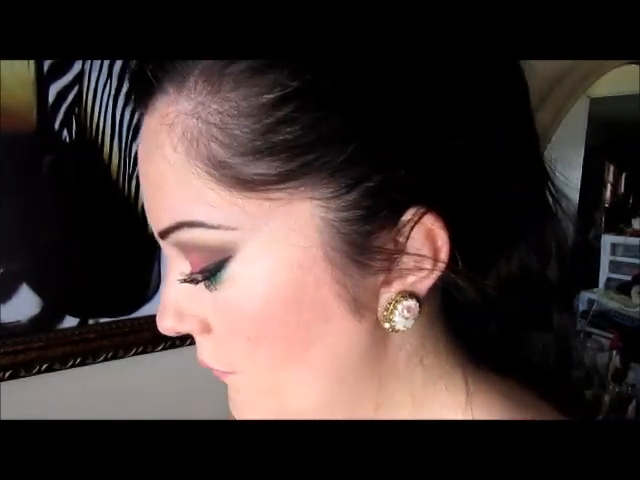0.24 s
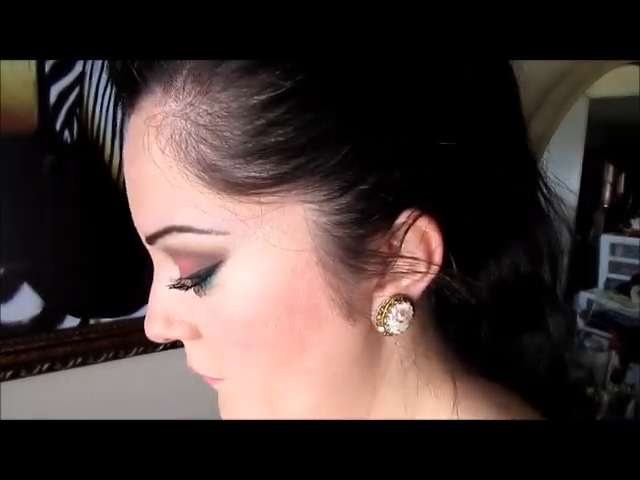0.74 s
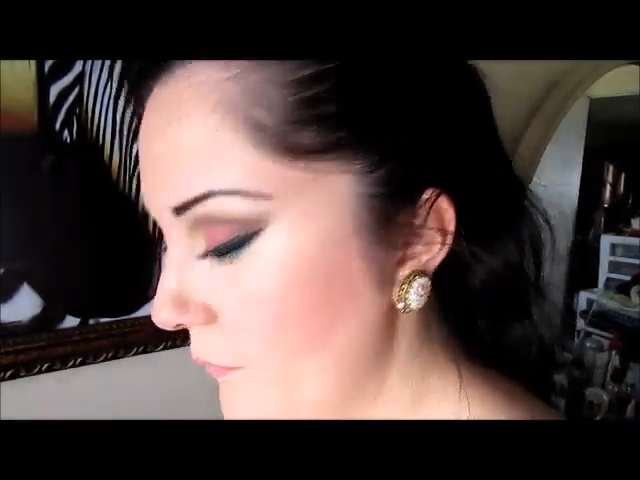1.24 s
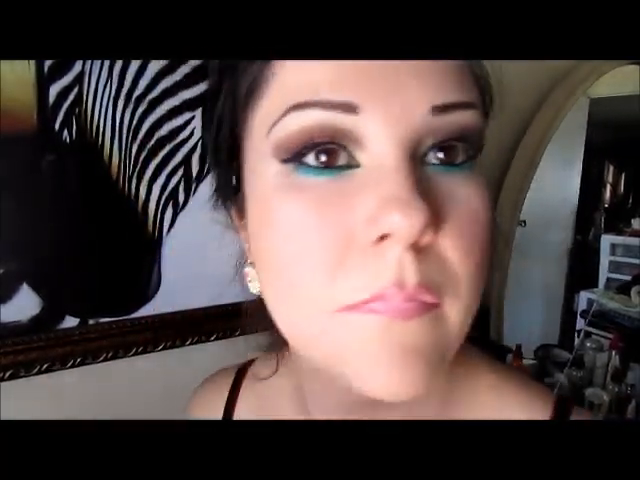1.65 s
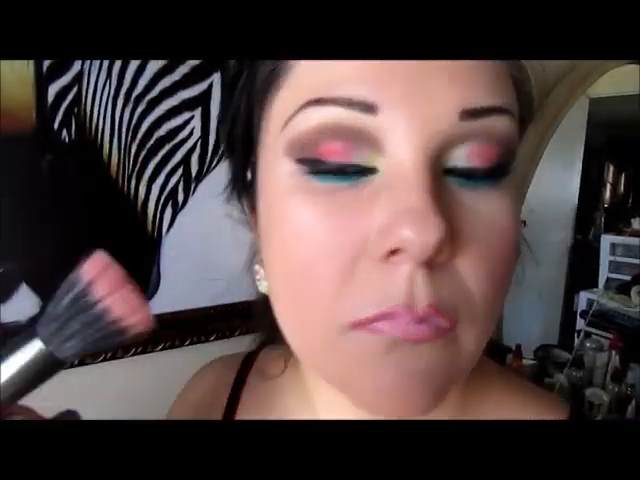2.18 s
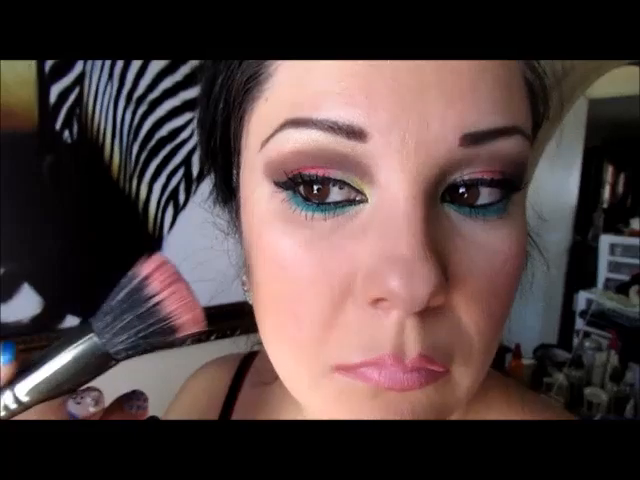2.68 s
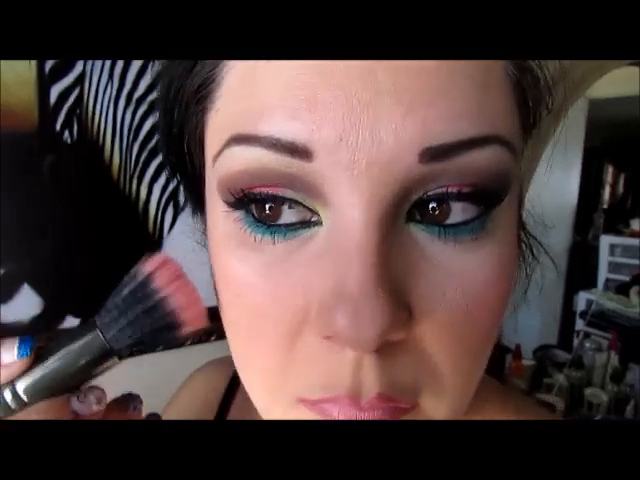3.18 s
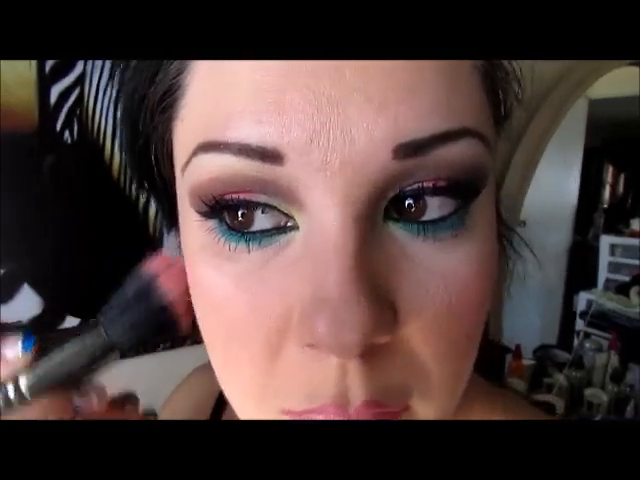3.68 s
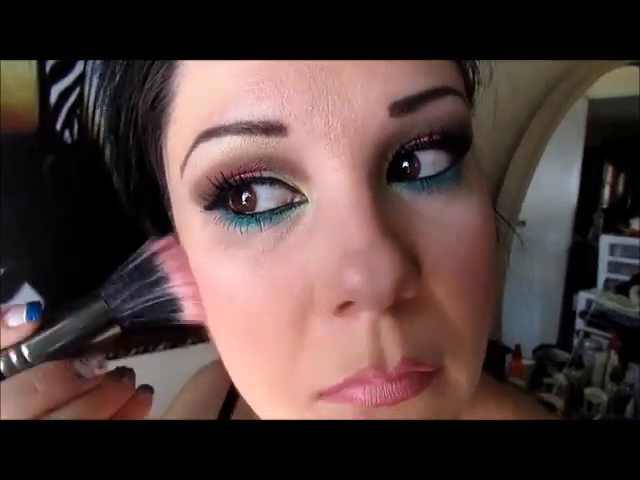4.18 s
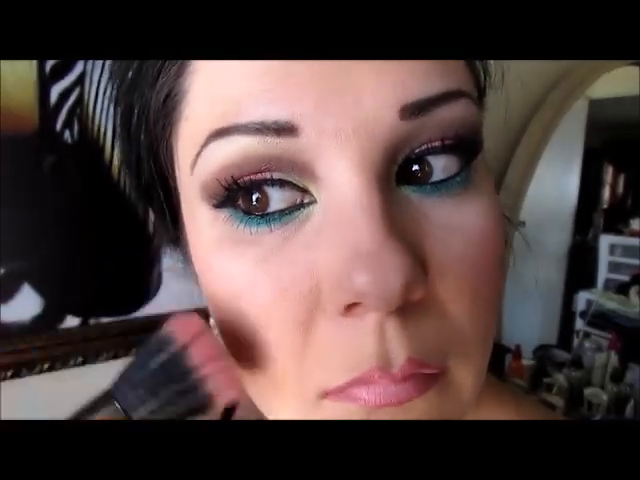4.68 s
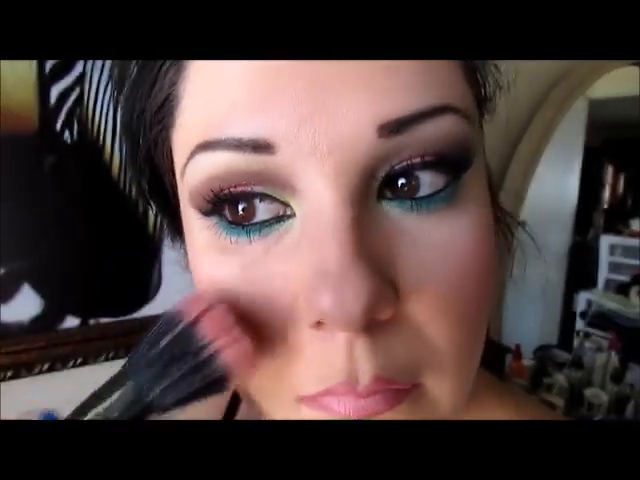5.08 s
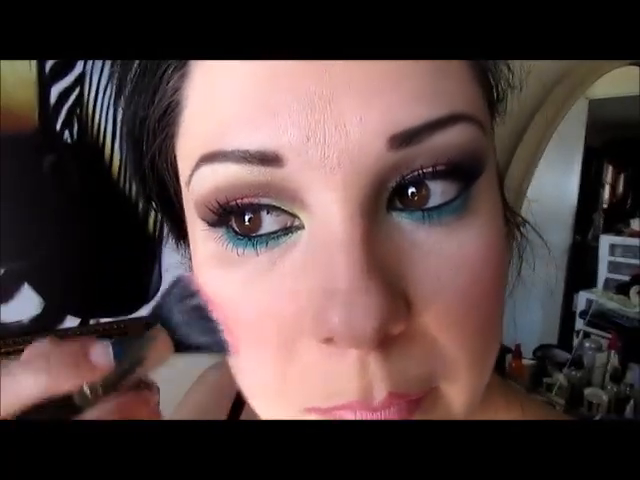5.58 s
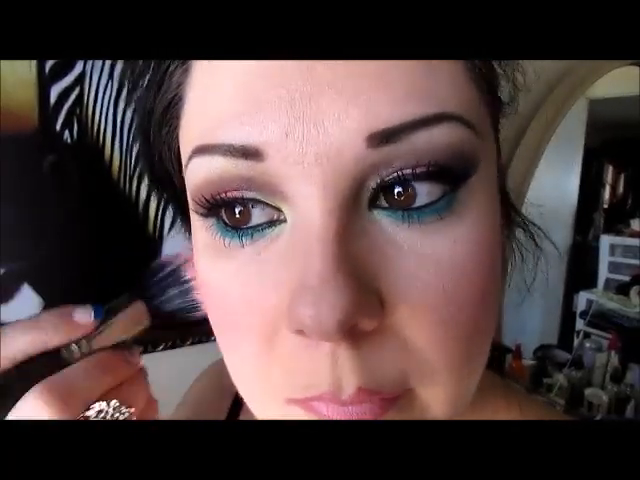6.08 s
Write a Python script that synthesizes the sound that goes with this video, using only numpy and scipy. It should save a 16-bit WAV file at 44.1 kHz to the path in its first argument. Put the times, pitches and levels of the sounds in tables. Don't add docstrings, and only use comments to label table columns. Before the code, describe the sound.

A rapid cluster of hollow plastic clacks and crisp hinge clicks comes first, slightly left. It thins to light taps, then a gap of bassy background hiss. A brush hand bumps the table, five firm knocks growing louder, rattling the camera stand with low wide shakes. Afterwards it is quiet indoors, with faint high focus-motor pips and weak late knocks picked up by the camera's built-in stereo microphone.

```python
import sys
import numpy as np
from scipy import signal
from scipy.fft import rfft, irfft
from scipy.io import wavfile
from scipy.ndimage import uniform_filter1d

SR = 44100
rng = np.random.default_rng(int(sys.argv[2]) if len(sys.argv) > 2 else 0)


def bounce(signal):
    frames = np.transpose(np.atleast_2d(signal))
    limited = np.clip(frames, -1, 1)
    pcm = np.round(limited * 32767).astype(np.int16)
    wavfile.write(sys.argv[1], SR, pcm)


def nominal_scale(level):
    x = np.asarray(level, float) / 20
    return 10 ** x


N = 279549
TIME = np.arange(SR // 3) / SR
SPOT_DB = 2


def peak_one(x):
    return x / np.max(np.abs(x))


def add(out, start_s, sound):
    i = round(start_s * SR)
    out[..., i:i + sound.shape[-1]] += sound[..., :N - i]


def band(x, low_hz, high_hz):
    sos = signal.butter(2, [low_hz, high_hz], "band", fs=SR, output="sos")
    y = signal.sosfilt(sos, x)
    return y / y.std()


def low_cut(x, hz):
    return signal.sosfilt(signal.butter(3, hz, "high", fs=SR, output="sos"), x)


def ringing(hz, level_db, t60_s, lead_rad=0):
    decay = nominal_scale(level_db[:, None] - 60 * TIME / np.maximum(t60_s, .002)[:, None])
    phase = 2 * np.pi * hz[:, None] * TIME + np.reshape(lead_rad, (-1, 1))
    return (decay * np.sin(phase)).sum(axis=0)


def soft_blow(x, contact_s):
    return np.convolve(x, np.hanning(int(contact_s * SR) + 3))[:len(x)]


def rattle(length_s, share, size):
    grains = rng.standard_normal(size) * nominal_scale(1.97 * rng.exponential(1, size))
    grains = grains * (rng.random(size) < share)
    age = TIME[:size] / max(length_s, .001)
    return peak_one(grains * np.sqrt(age + 0.2) * np.exp(-1.5 * age ** 2))


def crackle(clicks, hz):
    hump = band(clicks, 0.92 * hz, min(1.104 * hz, 16000))
    return peak_one(band(clicks, 1400, 7340) + 0.63 * hump)


def compact(grip_db):
    # hz, level_db, t60_s
    hollow_modes = [(198, -31, 0.044), (265, -10.5, 0.079), (320, -8, 0.077), (435, -33, 0.033),
                    (506.4, 3, 0.025), (549, -5.5, 0.071), (626, -9.5, 0.036), (706, -14.5, 0.048)]
    # hz, level_db, t60_s
    shell_modes = [(831, 5, 0.036), (924, 0.5, 0.031), (1060, 1.5, 0.026), (1110, 1, 0.027),
                   (1295, 9.5, 0.013), (1370, 5, 0.02), (1420, -11, 0.035), (1630, -9, 0.063),
                   (1706, -0.5, 0.044), (1890, -17, 0.022), (2100, -9, 0.017), (2390, -13, 0.012),
                   (2590, -9, 0.018)]
    parts = np.zeros((3, N))
    for start_s, hollow_db, shell_db, crack_db, crack_hz, rattle_s in contacts():
        clicks = rattle(rattle_s, share=0.43, size=1500)
        touch_s = .00003 * max(shell_db - crack_db, 0)
        bodies = (parts[0], hollow_modes, hollow_db), (parts[1], shell_modes, shell_db + 5.0)
        for part, modes, db in bodies:
            hz, mode_db, t60_s = np.transpose(modes)
            held = rng.standard_normal((2, len(hz)))
            rung = ringing(hz * (1 + 0.022 * held[0]), mode_db + grip_db * held[1], t60_s)
            rung = soft_blow(rung, touch_s)
            add(part, start_s, nominal_scale(db) * peak_one(signal.fftconvolve(clicks, rung)))
        add(parts[2], start_s, nominal_scale(crack_db + 4.5) * crackle(clicks, crack_hz))
    return parts


def contacts():
    # start_s, hollow_db (peak), shell_db (re hollow), rattle_s
    thump_table = [(0.4404, -10, -19, .0012), (0.492, -22.5, -9, 0.0033), (0.698, -26.5, -20, 0.0056),
                   (.707, -11.5, -23.5, 0.0047), (.719, -15.5, -29, 0.0015), (.818, -38, -21, 0.0053),
                   (0.941, -25.5, -14, 0.0096), (.948, -22, -8.5, 0.0031), (.954, -31, -23, 0.0053),
                   (1.018, -33.5, -16.5, 0.013), (1.085, -33.5, -2.5, 0.002), (1.118, -31, -2, 0.0051),
                   (1.127, -27.5, -7, 0.0057), (1.246, -46.5, -19, 0.0087)]
    # start_s, hollow_db (peak), crack_db (re hollow), crack_hz, rattle_s
    snap_table = [
        (0.308, -15.5, -24.5, 5600, 0.0016),
        (.311, -18, -22.5, 6160, 0.0028),
        (.444, -13, -23, 6000, 0.0033),
        (.463, -21, -7.5, 7460, 0.0061),
        (0.466, -22.5, -16, 11000, 0.01),
        (0.885, -35.5, -12, 6700, 0.0055),
        (.901, -18, -24.5, 6460, 0.0053),
        (0.905, -22.5, -14, 4750, 0.0044),
    ]
    # start_s, shell_db (peak), crack_db (re shell), crack_hz, rattle_s
    lid_table = [(.32, -25.5, -29, 3000, 0.005), (0.457, -27, -13, 2650, 0.015),
                 (0.515, -28, -9.5, 3000, 0.015), (0.543, -26.5, -4.5, 3260, 0.0042),
                 (0.548, -27, -10, 5920, 0.014), (.583, -42, -8, 6000, 0.0084),
                 (0.751, -40, -7, 3220, 0.00505), (0.804, -36, -1, 3470, 0.0073),
                 (.828, -37, -13, 2200, 0.0036), (0.853, -31, -13, 2700, 0.0069)]
    events = []
    for start_s, db, shell_db, rattle_s in thump_table:
        events.append((start_s, db, db + shell_db, db - 30.5, 2900, rattle_s))
    for start_s, db, crack_db, hz, rattle_s in snap_table:
        events.append((start_s, db, db - 10.5, db + crack_db, hz, rattle_s))
    for start_s, db, crack_db, hz, rattle_s in lid_table:
        hollow_db = db + 4 - 900 * rattle_s
        events.append((start_s, hollow_db, db, db + crack_db, hz, rattle_s))
    return sorted(events)


def rubbing():
    # start_s, hold_s, dull_db, bright_db (re dull), rumble_db (re dull)
    slide_table = [(.328, .005, -45.5, -22, -4.5), (0.442, 0.11, -46, -9.5, -4),
                   (0.549, 0.018, -44.5, -12, -1.5), (0.708, 0.053, -45, -22, -5), (.82, 0.06, -49, -17, 1),
                   (.94, .02, -56.5, -13, 11.5), (1.02, 0.037, -58, -18, 6.5),
                   (1.128, 0.0034, -52.5, -24, 0), (1.26, 0.063, -62.5, -9.5, -8)]
    attack_db_per_s, release_db_per_s = 700, 177
    slips = rng.standard_normal((3, N)) * nominal_scale(2.1 * rng.exponential(1, (3, N)))
    noises = np.array([band(slips[0], 220, 970), band(slips[1], 1300, 8300), band(slips[2], 64, 184)])
    t = np.arange(2 * SR) / SR
    gain = np.zeros((3, 2 * SR))
    for start_s, hold_s, dull_db, bright_db, rumble_db in slide_table:
        rise_db = attack_db_per_s * np.maximum(start_s - t, 0)
        fade_db = release_db_per_s * np.maximum(t - start_s - hold_s, 0)
        slide = nominal_scale(dull_db - rise_db - fade_db) * nominal_scale([[0], [bright_db], [rumble_db]])
        gain = np.maximum(gain, slide)
    return noises * np.pad(gain, ((0, 0), (0, N - 2 * SR)))


def struck(modes, blow, contact_s, rise_s):
    hz, db, t60_s, diff_db, lead_rad = np.transpose(modes)
    db = db + SPOT_DB * rng.standard_normal(len(hz))
    swell = 1 - np.exp(-TIME / max(rise_s, .0001))
    in_sum = soft_blow(swell * ringing(hz, db, t60_s), contact_s)
    in_diff = soft_blow(swell * ringing(hz, db + diff_db, t60_s, lead_rad), contact_s)
    both = signal.fftconvolve([in_sum, in_diff], blow[None])
    return both / np.max(np.abs(both[0]))


def knocks():
    # start_s, stand_db (peak), panel_db (re stand), bracket_db (re stand)
    knock_table = [
        (2.192, -32.5, -2, 4.5),
        (2.496, -29.5, -0.5, -9.5),
        (2.548, -26.5, 0, -12),
        (2.674, -25, -0.5, -9.5),
        (2.748, -20.5, -4, -11.5),
        (4.957, -37.5, -3.5, -14),
        (4.974, -45, 3, -8),
        (5.642, -48.5, 1.5, -9.5),
    ]
    # hz, level_db, t60_s, diff_db (re sum), lead_rad (of difference)
    panel_modes = [(195.6, -16.5, 0.27, 6, .1), (260, -9.5, 0.12, 3, .1), (283.3, -16, 0.28, 12, 1.4),
                   (325.5, 18, 0.045, 2, 1.06), (388, -2, 0.087, 9.5, 0.038), (481, -5, 0.11, -7, .1),
                   (553, -7, 0.077, 17.5, .1), (600, -6.5, 0.087, 8, .1), (697, -3, 0.057, -3, .1),
                   (815, -16, 0.046, 24, .1)]
    stand_modes = [(963.5, -2, 0.097, -3.5, 0.38), (968, 9.5, 0.056, -4.5, .3), (944, -8, 0.21, -15, .3),
                   (827, 1.5, 0.03, -4, .3), (1070, -2, 0.028, -12, 0.25), (1200, -13, 0.057, -2, .3)]
    bracket_modes = [(1280, 6.5, 0.0095, 0, 2.8), (1397, 2, 0.014, 5, 2.6), (1527, 4, 0.023, -3, 2.1),
                     (1850, -10.5, 0.041, -17, 3), (2100, -4, 0.017, 1, 0.8), (2430, -10.5, 0.025, 2, 1.5),
                     (3000, -14, 0.029, -10, .3), (3770, -8.5, 0.019, -16, .3)]
    # hz, level_db, t60_s
    sway_modes = [(82.5, -16, 0.14), (154.7, -3, 0.13), (211.6, -1.5, 0.22), (246, -14, 0.23)]
    # start_s, level_db (peak), length_s
    settling_table = [(2.503, -58, 0.011), (2.59, -60, 0.007), (2.597, -44, 0.0092), (2.698, -31, 0.0042),
                      (2.714, -33, 0.015), (2.777, -49, 0.0066), (2.798, -42.5, 0.0059),
                      (2.811, -53.5, 0.018), (2.837, -53, .01)]
    out = np.zeros((2, N))
    for start_s, db, panel_db, bracket_db in knock_table:
        blow = 0.024 * rattle(0.0085, share=0.097, size=3000)
        blow[0] = 1
        bodies = ((panel_modes, panel_db, .0012, .004),
                  (stand_modes, 0, .0006, .0015),
                  (bracket_modes, bracket_db, .0003, .0008))
        for modes, rel_db, contact_s, rise_s in bodies:
            add(out, start_s, nominal_scale(db + rel_db + 3.5) * struck(modes, blow, contact_s, rise_s))
        hz, mode_db, t60_s = np.transpose(sway_modes)
        sway = ringing(hz, mode_db + SPOT_DB * rng.standard_normal(len(hz)), t60_s)
        rock_db = -1.5 + 0.56 * db
        rock = nominal_scale(rock_db) * peak_one(soft_blow(sway, 0.0032))
        add(out, start_s + 0.0042, rock * [[.12], [1]])
    for start_s, db, length_s in settling_table:
        chatter = rattle(length_s, share=0.19, size=1500)
        add(out, start_s, nominal_scale(db) * struck(stand_modes[:3], chatter, 0.0014, 0.00072))
    return out


def hums():
    # start_s, level_db (peak), pitch_hz, t60_s
    hum_table = [
        (2.193, -33.5, 1551, 0.036),
        (2.194, -38.5, 537, 0.066),
        (2.785, -45.5, 336, 0.28),
        (4.972, -42.5, 280, 0.17),
        (5.655, -51.5, 290, 0.19),
    ]
    out = np.zeros(N)
    swell = 1 - np.exp(-TIME / 0.0021)
    for start_s, db, hz, t60_s in hum_table:
        tone = swell * nominal_scale(-60 * TIME / t60_s) * np.sin(2 * np.pi * hz * TIME)
        add(out, start_s, nominal_scale(db) * peak_one(tone))
    return out * np.array([[1], [.5]])


def ticks():
    # start_s, level_db (peak), centre_hz, length_s
    tick_table = [(2.192, -50, 2190, 0.0049), (2.496, -56, 2390, 0.0051), (2.549, -61, 2180, 0.0047),
                  (2.556, -47, 2730, 0.0068), (2.562, -52, 5130, 0.0014), (2.674, -53, 2200, 0.0035),
                  (2.682, -46.5, 3000, 0.0048), (2.749, -61, 2100, 0.0033), (2.752, -44, 3920, 0.0014),
                  (2.756, -54.5, 7000, .0015), (2.761, -50, 7600, 0.0024)]
    out = np.zeros(N)
    for start_s, db, hz, length_s in tick_table:
        add(out, start_s, nominal_scale(db) * crackle(rattle(length_s, share=1.0, size=600), hz))
    return out


def pips():
    # start_s, level_db (peak), pitch_hz
    pip_table = [(3.082, -49.5, 1630), (3.5609, -51.5, 1670), (4.2815, -50.5, 1630), (4.401, -46, 1645),
                 (4.762, -50.5, 1660), (4.879, -52.5, 1620), (5.717, -54.5, 1620)]
    out = np.zeros(N)
    shape = TIME * np.exp(-TIME / 0.0021)
    for start_s, db, hz in pip_table:
        add(out, start_s, nominal_scale(db) * peak_one(shape * np.sin(2 * np.pi * hz * TIME)))
    return out


def room(x):
    t60_s, level_db, cut_hz = 0.094, -15, 2120
    tail = rng.standard_normal((2, len(TIME))) * nominal_scale(-60 * TIME / t60_s) * (TIME > .004)
    tail = signal.sosfilt(signal.butter(1, cut_hz, fs=SR, output="sos"), tail)
    tail = tail / np.sqrt(np.sum(tail ** 2, axis=1, keepdims=True))
    return nominal_scale(level_db) * signal.fftconvolve(tail, x[None])[:, :N]


def coloured(points):
    hz, db = np.transpose(points)
    grid_hz = np.maximum(np.arange(N // 2 + 1) * SR / N, 1)
    shape = nominal_scale(np.interp(np.log(grid_hz), np.log(hz), db))
    x = irfft(rfft(rng.standard_normal(N)) * shape, N)
    return x / x.std()


def hiss():
    # hz, density_db (per Hz)
    sum_spectrum = [(20, -21.5), (66, 0.5), (160, -8.5), (290, -7.5), (560, -13), (1000, -17.5),
                    (1650, -19.5), (2100, -21.5), (2700, -30), (3900, -29), (4900, -33.5), (6500, -30.5),
                    (11000, -33), (15800, -39.5)]
    diff_spectrum = [(15, -43), (25, -20), (84, 3), (117, -2), (190, 0.5), (256, -3), (394, -5), (503, -9),
                     (545, -8), (796, -12.5), (863, -12.5), (1560, -21), (3620, -46), (12200, -46.5),
                     (16000, -51)]
    return nominal_scale(-58) * coloured(sum_spectrum), nominal_scale(-45.5) * coloured(diff_spectrum)


def whine():
    return nominal_scale(-91) * np.sqrt(2) * np.sin(2 * np.pi * 15735 * np.arange(N) / SR)


def scene():
    hollow, shell, crack = compact(grip_db=2.5)
    dull_rub, bright_rub, rumble = rubbing()
    low = low_cut(hollow + shell, 248) + dull_rub
    high = crack + bright_rub + ticks()
    knock_sum, knock_diff = knocks() + hums()
    knock_sum, knock_diff = low_cut(knock_sum, 125), low_cut(knock_diff, 60)
    wet_sum, wet_diff = room(low + high + 0.93 * knock_sum)
    hiss_sum, hiss_diff = hiss()
    total = low + high + rumble + knock_sum + wet_sum + pips() + whine() + hiss_sum
    apart = 0.26 * (np.roll(high, shift=-1) - np.roll(high, shift=1))
    diff = 0.41 * low + apart + knock_diff + 0.65 * wet_diff + hiss_diff
    return np.array([total + diff, total - diff])


def band_limit(x):
    return signal.sosfilt(signal.butter(12, 16300, fs=SR, output="sos"), x)


def record(dry):
    # threshold_db, share of the excess taken off, recovery_db_per_s
    threshold_db, share, recovery_db_per_s = (-16, 0.95, 4.4)
    level_db = 10 * np.log10(uniform_filter1d(np.max(dry ** 2, axis=0), size=441) + 1e-12)
    ramp_db = recovery_db_per_s * np.arange(N) / SR
    excess_db = share * np.maximum(level_db - threshold_db, 0)
    cut_db = np.maximum.accumulate(excess_db + ramp_db) - ramp_db
    cut_db = signal.lfilter([.001], [1, -.999], cut_db)
    top_cut = signal.ellip(14, .3, 60, 15800, fs=SR, output="sos")
    return band_limit(signal.sosfilt(top_cut, dry * nominal_scale(-cut_db)))


dry = scene()
out = record(dry)
bounce(out)
```